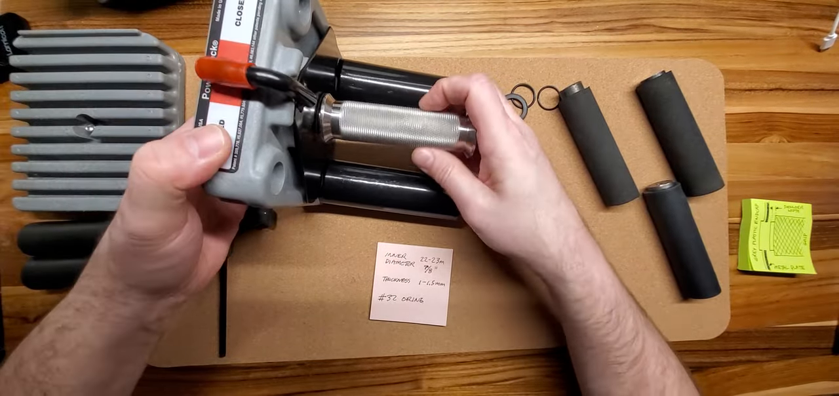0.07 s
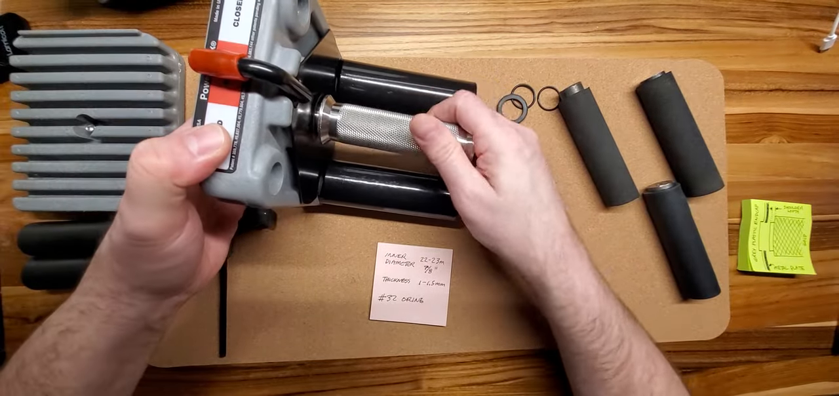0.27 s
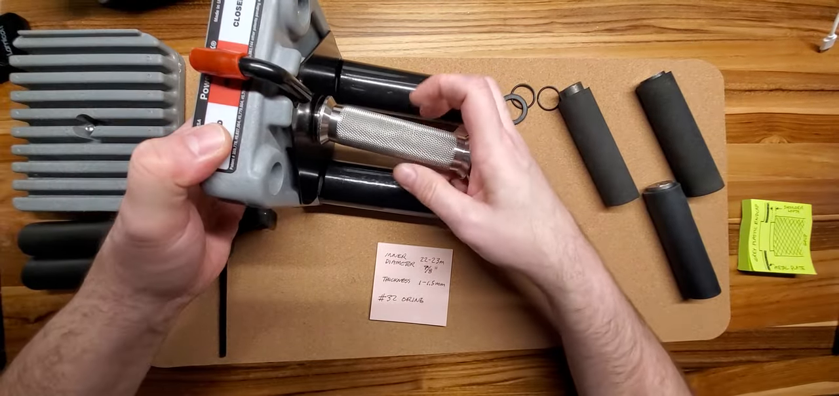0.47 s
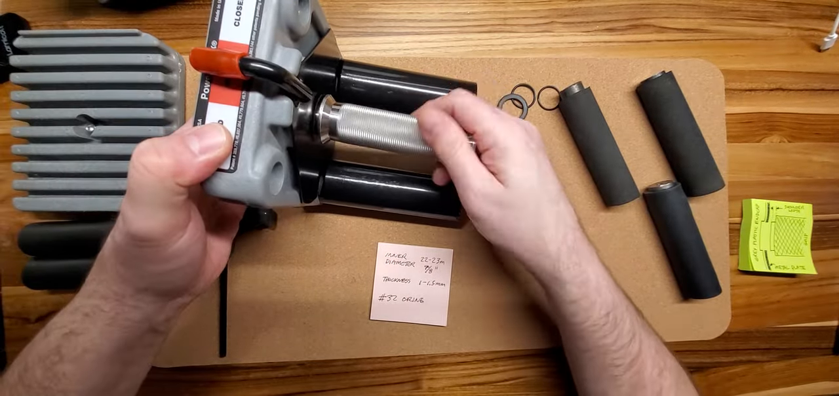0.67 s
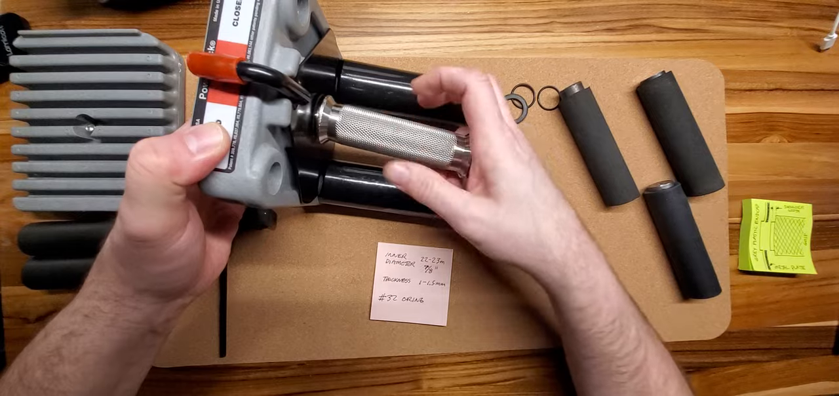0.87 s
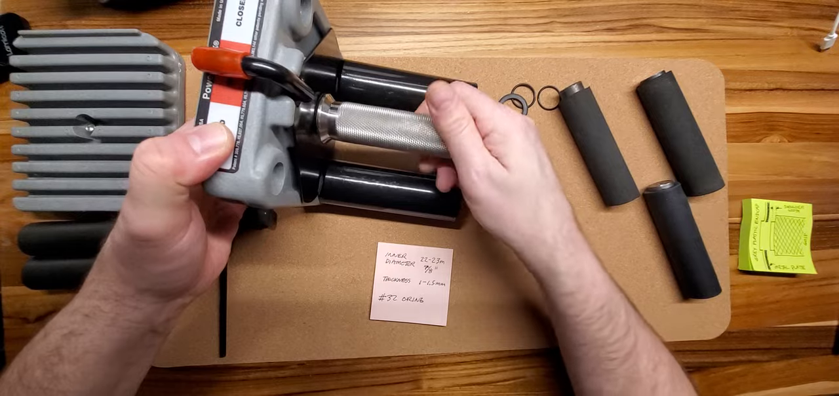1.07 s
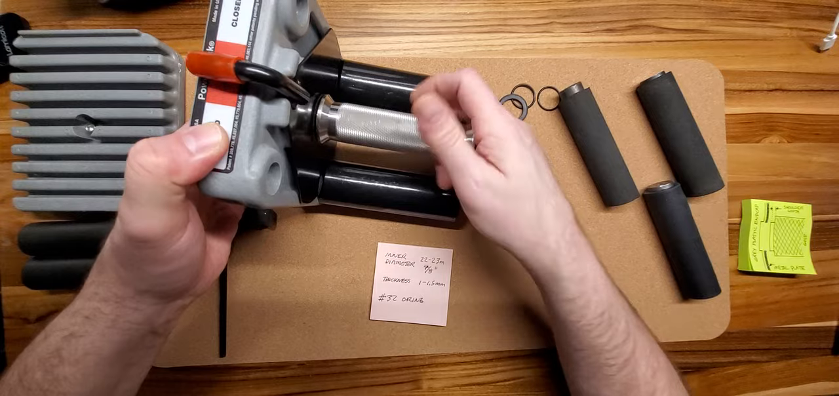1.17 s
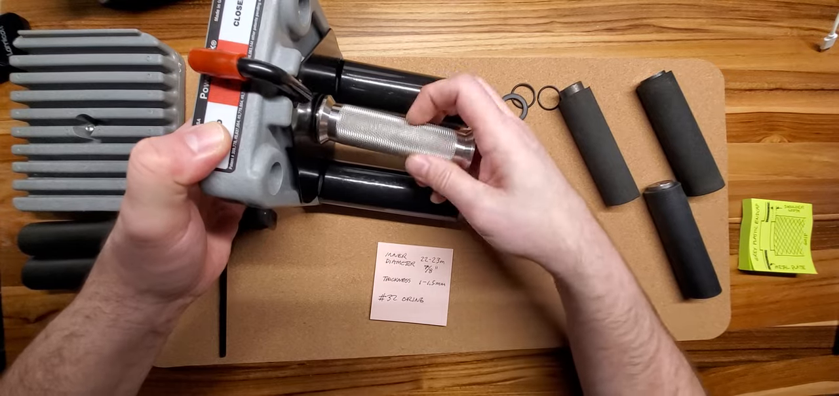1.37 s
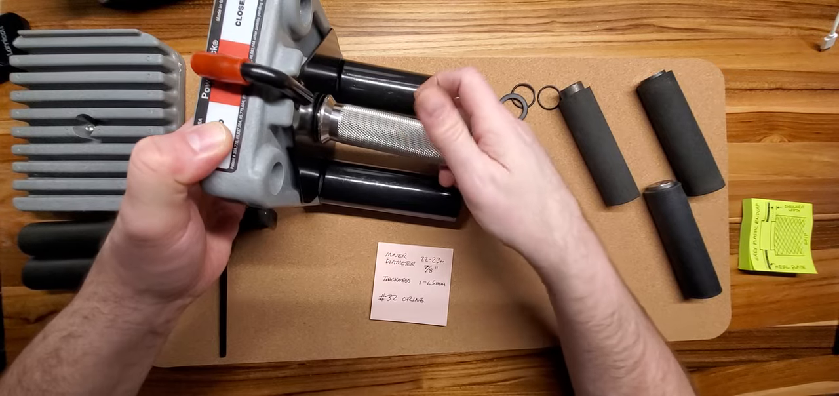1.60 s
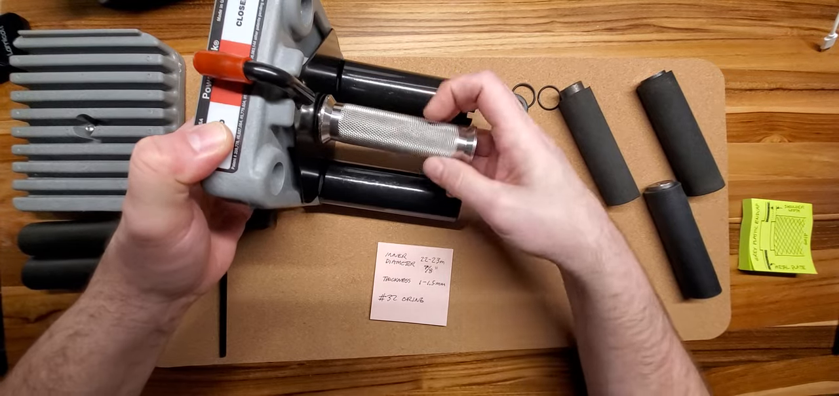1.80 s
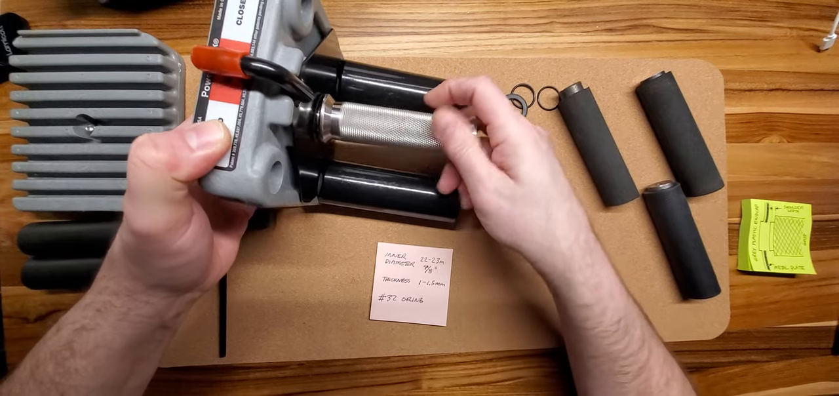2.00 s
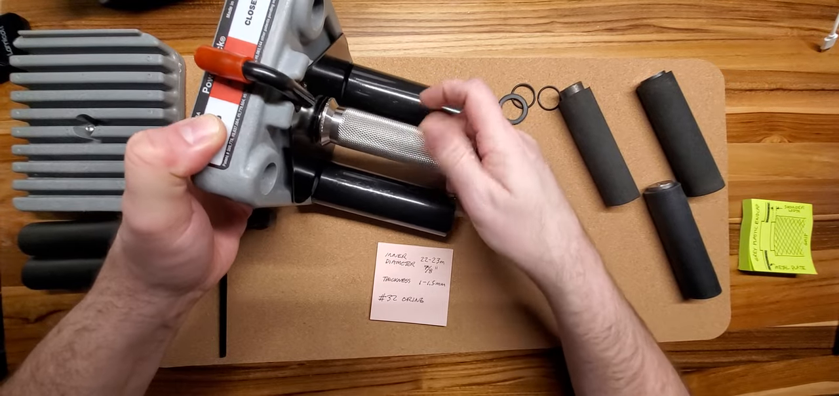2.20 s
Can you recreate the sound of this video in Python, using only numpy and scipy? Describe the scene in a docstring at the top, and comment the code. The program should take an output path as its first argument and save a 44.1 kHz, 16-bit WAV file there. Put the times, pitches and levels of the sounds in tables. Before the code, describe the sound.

Sharp metal clacks and light rattles as a hand twists a loose dumbbell grip.

```python
"""Sharp metallic clacks with a brief ring come in clusters as a hand twists the loose knurled sleeve on
the steel handle of an adjustable dumbbell lying on a workbench. Each impact excites the damped modes
of frame, bar, sleeve and bench. Between knocks, stick-slip friction makes the sleeve scrape softly and
squeak once, and the frame shuffles on its mat. The room is small and quiet, heard from close above."""
import sys
import numpy as np
from scipy import signal
from scipy.fft import rfft, irfft
from scipy.io import wavfile
from scipy.ndimage import uniform_filter1d, map_coordinates

SR = 44100
rng = np.random.default_rng(int(sys.argv[2]) if len(sys.argv) > 2 else 0)


def to_wav(s):
    """Save 16-bit WAV."""
    ch = np.atleast_2d(s).T  # columns
    pcm = np.round(np.clip(ch, -1, 1) * 32767)  # PCM
    wavfile.write(sys.argv[1], SR, pcm.astype(np.int16))


N = 99225

# Impacts. Each row: start in seconds, clack level in dB, its bass and treble shelves in dB, bar ring
# in dB, frequency in Hz of the mode favoured by the contact point, that mode's level in dB.
KNOCKS = [ (0.031, -34.5, -8.5, -7.5, -53.5, 3544, -57), (0.2089, -19.5, -11, 8.5, -70, 5798, -20.5),
          (0.2238, -12, -11, 9.5, -29.5, 5025, -27.5), (.237, -26.5, 0, -2, -40.5, 3544, -33),
          (.814, -49, 0.5, -6, -61.5, 2328, -52), (1.083, -32, 8, 10, -55, 382, -33),
          (1.102, -23.5, -4.5, -18, -45, 2745, -27.5), (1.146, -33, 1.5, 3.5, -68, 326, -38.5),
          (1.282, -33.5, 2, 7, -77, 2690, -30), (1.2885, -17.5, -12.5, 1, -36.5, 2520, -26),
          (1.295, -29, -1.5, -2, -42.5, 1690, -30), (1.501, -33, 6, 8.5, -75, 1838, -50.5),
          (1.513, -35, 3, 4, -50, 3410, -30.5), (1.516, -41, 6, 13, -37, 5652, -29.5),
          (1.641, -28.5, -9, -6, -58, 2745, -34), (1.698, -23, -13, -14, -41.5, 5200, -35),
          (1.705, -25.5, -16.5, -14, -60, 2328, -23.5), (1.92, -22, -10.5, -9.5, -43.5, 2690, -22.5),
          (1.947, -26, -6.5, 4, -62, 5975, -43), (1.959, -41, 8.5, -28.5, -63.5, 2140, -26.5)]
# Dull bumps of the frame. Each row: start in seconds, level in dB, bass shelf in dB.
BUMPS = [(0.202, -22, -3.5), (0.281, -49, 23), (0.401, -32, -3), (.478, -53, 17), (1.573, -44, 6),
         (1.781, -36, -8.5), (2.086, -34.5, 5.5)]
# Sliding contacts. Each row: start and length in seconds, then scrape, chatter and shuffle in dB.
SLIDES = [(-.03, 0.071, -89, -61, -48.5), (0.082, 0.3, -55, -60, -48), (0.307, 0.13, -81, -51, -45),
          (0.615, 0.16, -56, -62, -61.5), (0.702, 0.16, -74.5, -73, -60.5), (0.983, 0.18, -59, -72, -55),
          (1.112, 0.053, -74, -44, -42.5), (1.182, 0.13, -56.5, -84, -57), (1.39, 0.2, -61, -63.5, -59.5),
          (1.654, .065, -65, -51, -55), (2.048, 0.076, -53.5, -59, -59.5)]
# Modes of the steel bar. Each row: frequency in Hz, relative level in dB, 60 dB decay time in seconds.
BAR_MODES = [(1838, -10.5, .7), (2328, 0, .2), (2745, -8, .17), (3120, -10, .35), (3410, -5, .32),
             (3544, -9, .35), (4795, -12, .33), (5025, -24, .56), (5652, -6, .14), (6397, -6, .23)]
# Modes of sleeve and bench. Each row: frequency in Hz, relative level in dB.
SLEEVE_MODES = [(1690, -8), (2140, 2), (2520, -5), (2690, 5.5), (3172, 1.5), (4513, -4.5), (5200, -4.5),
                (5798, -13), (5975, -1), (7370, -0.5)]  # damped by the fingers
BENCH_MODES = [(144, -5.5), (178, -9.5), (326, -13), (382, -4.5)]  # the top with the weights on it
# Spectral envelopes. Each row: frequency in Hz, relative spectral density in dB.
CLACK_SPECTRUM = [(140, -11), (400, 5), (700, 0), (1400, 3), (2600, 1), (3500, -4), (6200, -6.5),
                  (8000, -13.5), (15500, -27)]
SCRAPE_SPECTRUM = [(2600, -11.5), (7400, 2), (15000, -1)]
SHUFFLE_SPECTRUM = [(40, -22), (140, 2), (240, -3), (390, 16), (1200, -41)]
AIR_SPECTRUM = [(20, -29), (144, -3.5), (274, -14.5), (1200, -18.5), (15500, -36.5)]
# Stereo balance. Each row: frequency in Hz, left minus right level in dB.
BALANCE = [(1000, 0), (7000, 5.5), (15000, 3.5)]
# Microphone notches. Each row: centre in Hz, half width in Hz, gain in dB.
MIC_DIPS = [(3985, 150, -6.5), (9440, 940, -9)]

BASS_EDGE_HZ, TREBLE_EDGE_HZ, TOP_HZ = 1010, 3870, 15900
CLACK_T60_S, AFTER_RING_T60_S, AFTER_RING_DB = 0.051, 0.14, -18.5
SLEEVE_T60_S, SLEEVE_DB, SLEEVE_GROWTH = 0.098, -1.5, 1.73  # growth in dB per dB of clack
BENCH_T60_S, BENCH_DB = 0.27, -14
FINGER_AT_S, FINGER_CLOSE_S, FINGER_DB = 0.409, 0.0078, -10.5
SIDES = np.array([[1], [-1]])  # left, right


def knocks():
    """Impact excitation: each blow clacks the frame and rings the modes of bar, sleeve and bench."""
    t = np.arange(SR) / SR
    clack = frame_clack()
    sleeve = [(*mode, SLEEVE_T60_S) for mode in SLEEVE_MODES]
    bench = [(*mode, BENCH_T60_S) for mode in BENCH_MODES]
    hz, db, t60 = np.array(BAR_MODES + sleeve + bench, float).T
    ring = modal_body(hz, t60, t)
    clacks, rings = np.zeros((2, N)), np.zeros((2, N))

    def strike(at, clack_db, bass_db, treble_db, bar_db, favoured_hz=None, favoured_db=None):
        add(clacks, at, clack(clack_db, bass_db, treble_db))
        sleeve_db = SLEEVE_DB + SLEEVE_GROWTH * clack_db  # rings out only on hard knocks
        bench_db = BENCH_DB + clack_db + bass_db
        mode_db = db + np.repeat([bar_db, sleeve_db, bench_db], [len(BAR_MODES), len(sleeve), len(bench)])
        if favoured_hz:
            mode_db[np.argmin(abs(hz - favoured_hz))] = favoured_db
        # A fingertip lands on the bar and lowers the rings already sounding.
        touch = np.clip((at + t - FINGER_AT_S) / FINGER_CLOSE_S, 0, 1) * (at < FINGER_AT_S)
        add(rings, at, ring(undb(mode_db)) * undb(FINGER_DB * touch))

    for knock in KNOCKS:
        strike(*knock)
    for bump in BUMPS:
        strike(*bump, treble_db=-18, bar_db=-64)
    return clacks, rings


def frame_clack(count=300):
    """High modal density: crowded, fast-dying modes merge into a clack. Returns a strike function."""
    t = np.arange(SR // 4) / SR
    hz = 60 + TOP_HZ * ((np.arange(count) + rng.random(count)) / count) ** 2
    decay_per_s = 9.7 * hz / 1000
    frame = modal_body(hz, np.log(1000) / decay_per_s, t)
    standout_db = np.where(np.arange(count) % 3, -4, 4) * (hz > TREBLE_EDGE_HZ)
    scatter_db = 0.5 * np.clip(rng.standard_normal(count), -2, 2)
    gains = undb(curve(CLACK_SPECTRUM, hz) + sleeve_lift(hz) + standout_db + scatter_db)
    gains *= hz ** 0.25  # offsets the wider spacing of high modes
    gains /= np.sqrt(np.sum(gains ** 2) / 2)
    bass = 1 / (1 + (hz / BASS_EDGE_HZ) ** 4)
    treble = 1 / (1 + (TREBLE_EDGE_HZ / hz) ** 4)
    envelope = fade(t, CLACK_T60_S) + undb(AFTER_RING_DB) * fade(t, AFTER_RING_T60_S)

    def clack(db, bass_db, treble_db):
        return frame(gains * undb(db + bass_db * bass + treble_db * treble)) * envelope
    return clack


def modal_body(hz, t60, t, attack_s=0.0022):
    """Superposition: a struck body sounds as a sum of damped sinusoids. Returns a strike function."""
    modes = np.exp(2j * np.pi * hz[:, None] * t) * fade(t, t60[:, None])
    skew = rng.choice([-1, 1], len(hz)) * rng.uniform(0.89, 1.435, len(hz))
    stereo_phase = np.exp(1j * SIDES * np.pi / 4 * spread(hz) * skew)
    onset = 1 - np.exp(-t / attack_s)

    def strike(gains):
        phase = np.exp(2j * np.pi * rng.random(len(hz)))
        return ((stereo_phase * gains * phase) @ modes).real * onset
    return strike


def slides(pitch_sag=0.04, hiss_db=-21, bar_coupling_db=16):
    """Forced vibration: friction drives the sleeve's modes, stirs the frame and faintly rings the bar."""
    t, f = np.arange(N) / SR, np.fft.rfftfreq(N, 1 / SR)
    sleeve = undb(hiss_db) + sum(abs(resonance(f, hz, width_hz=100)) ** 2 for hz, _ in SLEEVE_MODES)
    scrape = unit(colour(filtered(grit(), sleeve), SCRAPE_SPECTRUM))
    chatter = unit(colour(filtered(grit(), undb(sleeve_lift(f))), CLACK_SPECTRUM))
    shuffle = unit(colour(grit(), SHUFFLE_SPECTRUM))
    out = squeak(t, f)
    scrape_gain, lead_s = np.zeros(N), np.zeros(N)
    for start, length, scrape_db, chatter_db, shuffle_db in SLIDES:
        progress = np.clip((t - start) / length, 0, 1)
        speed = np.sin(np.pi * progress) ** 2
        out += speed * (undb(chatter_db) * chatter + undb(shuffle_db) * shuffle)
        scrape_gain += speed * undb(scrape_db)
        lead_s += pitch_sag * length * progress * (1 - progress) / 2  # time warp: sharp, then flat
    sagging = np.array([map_coordinates(side, [(t + lead_s) * SR], mode="mirror") for side in scrape])
    out += scrape_gain * sagging
    bar = sum(undb(db) * resonance(f, hz, np.log(1000) / np.pi / t60) for hz, db, t60 in BAR_MODES)
    return out + undb(bar_coupling_db) * filtered(out, bar)


def squeak(t, f, start_s=0.628, length_s=0.093, hz=2214, db=-55):
    """Narrow resonance: the twisted sleeve draws a brief tone out of friction noise."""
    tone = unit(filtered(grit(), resonance(f, hz, width_hz=50) ** 2))
    progress = np.clip((t - start_s) / length_s, 0, 1)
    return undb(db) * tone * np.sin(np.pi * progress)


def grit(jump_db=2.5):
    """Stick-slip friction: noise jumps in strength from catch to catch, in quick grains and slow jerks."""
    jumps = np.zeros(N)
    for hold in (SR // 500, SR // 70):
        catches = np.clip(rng.standard_normal(N // hold + 1), -1.7, 1.7)
        jumps += np.repeat(catches, hold)[:N]
    return stereo_noise(N) * uniform_filter1d(undb(jump_db * jumps), SR // 1000)


def sleeve_lift(f, peak_db=4.5, width_hz=50.4):
    """Coupling: the frame's sound gains these decibels near the sleeve's modes."""
    return peak_db * np.max([np.exp(-.5 * ((f - hz) / width_hz) ** 2) for hz, _ in SLEEVE_MODES], axis=0)


def room(x, db=-3, t60_s=0.19, treble_t60_s=0.16, gap_s=0.0024):
    """Reverberation: reflections from the bench and near walls follow the sound; the treble dies first."""
    t = np.arange(SR // 2) / SR
    noise = stereo_noise(len(t))
    dull = signal.sosfiltfilt(signal.butter(2, TREBLE_EDGE_HZ, fs=SR, output="sos"), noise)
    tail = dull * fade(t, t60_s) + (noise - dull) * fade(t, treble_t60_s)
    tail *= np.clip(t / gap_s - 1, 0, 1)
    tail /= np.sqrt(np.sum(tail ** 2) / 2)
    return x + undb(db) * signal.fftconvolve(x, tail, axes=1)[:, :N]


def room_tone(air_db=-66.5, hum_db=-69.5):
    """Noise floor: broadband air noise and a low hum that wavers because it is narrowband noise."""
    hum_band = resonance(np.fft.rfftfreq(N, 1 / SR), hz=95.7, width_hz=11) ** 2
    hum = unit(filtered(stereo_noise(N), hum_band))
    air = unit(colour(stereo_noise(N), AIR_SPECTRUM))
    return undb(air_db) * air + undb(hum_db) * hum


def stereo_noise(n):
    """Partial coherence: white noise, alike on both sides in the bass and unrelated above."""
    mid, side = rfft(rng.standard_normal((2, n)))
    share = spread(np.fft.rfftfreq(n, 1 / SR))
    return unit(irfft((mid + SIDES * np.sqrt(share) * side) / np.sqrt(1 + share), n))


def spread(hz, corner_hz=241):
    """Decorrelation: the share that differs between the channels rises with frequency."""
    return hz / (hz + corner_hz)


def resonance(f, hz, width_hz):
    """Frequency response of one mode, with gain 1 at its centre."""
    return 1 / (1 + 2j * (f - hz) / width_hz)


def fade(t, t60):
    """Exponential decay by 60 dB in t60 seconds."""
    return np.exp(-np.log(1000) * t / np.maximum(t60, 1e-3))


def filtered(x, response):
    """Linear filtering: the spectrum is multiplied by a frequency response."""
    return irfft(rfft(x) * response, N)


def colour(x, points):
    """Spectral shaping by an envelope of (Hz, dB) points."""
    return filtered(x, undb(curve(points, np.fft.rfftfreq(N, 1 / SR))))


def curve(points, hz):
    """Interpolation of (Hz, dB) points on a log-frequency axis."""
    f, db = np.array(points, float).T
    return np.interp(np.log(np.maximum(hz, 1)), np.log(f), db)


def undb(db):
    """Amplitude ratio from decibels."""
    return 10 ** (np.asarray(db) / 20)


def unit(x):
    """Normalisation to rms 1."""
    return x / np.sqrt(np.mean(x ** 2))


def add(out, start, x):
    """Superposition of x on out from start, in seconds."""
    i = int(max(start, 0) * SR)
    out[:, i:i + x.shape[1]] += x[:, :max(N - i, 0)]


def scene():
    """Level difference between the ears places the dumbbell a little to the left, over the room tone."""
    clacks, rings = knocks()
    left, right = room(clacks + slides()) + rings
    left = colour(left, [(hz, db / 2) for hz, db in BALANCE])
    right = colour(right, [(hz, -db / 2) for hz, db in BALANCE])
    return np.array([left, right]) + room_tone()


def record(dry):
    """Transducer response: the microphone has two treble dips, and a steep low-pass cuts the top."""
    f = np.fft.rfftfreq(N, 1 / SR)
    dips_db = sum(db / (1 + ((f - hz) / width) ** 2) for hz, width, db in MIC_DIPS)
    low_pass = signal.ellip(10, .1, 80, TOP_HZ, fs=SR, output="sos")
    return signal.sosfilt(low_pass, filtered(dry, undb(dips_db)))


dry = scene()
out = record(dry)
to_wav(out)
```